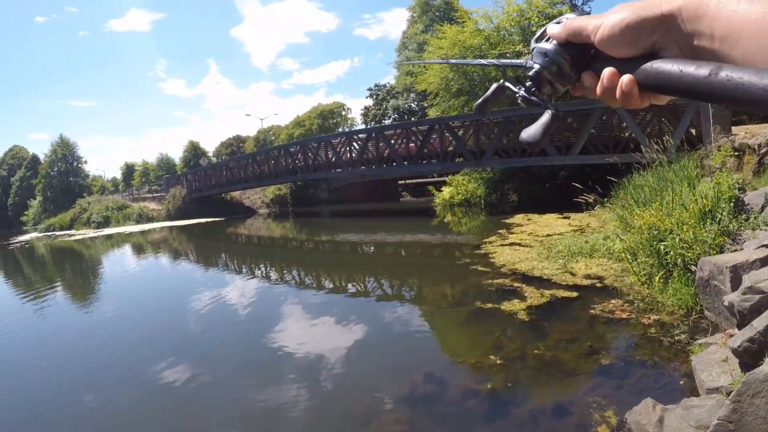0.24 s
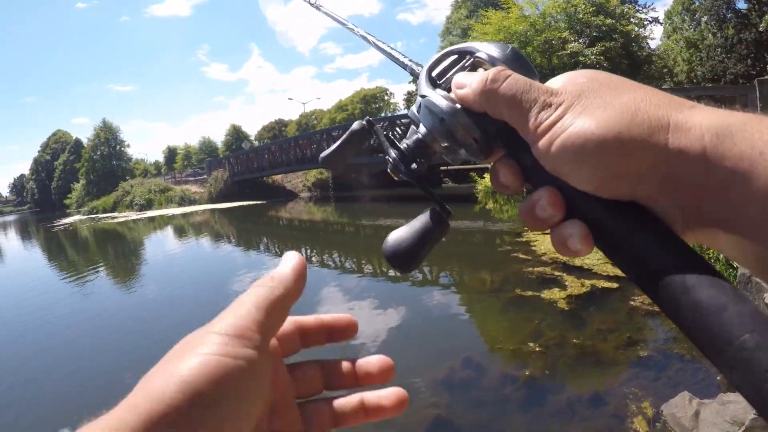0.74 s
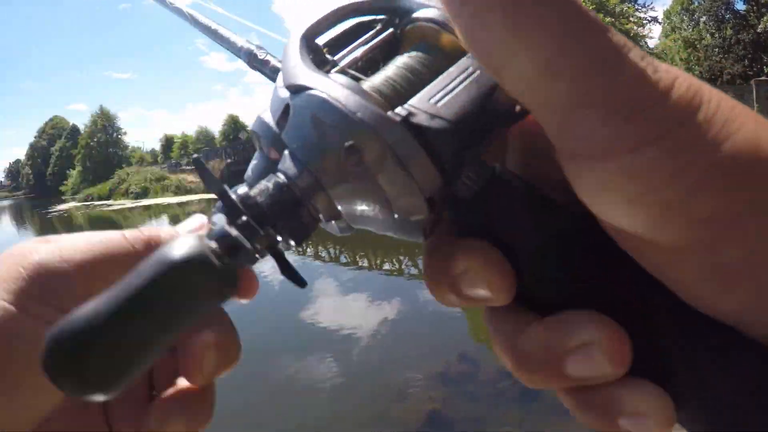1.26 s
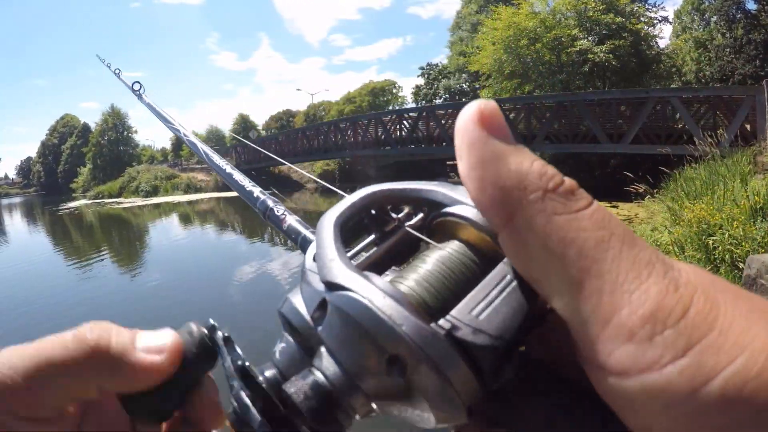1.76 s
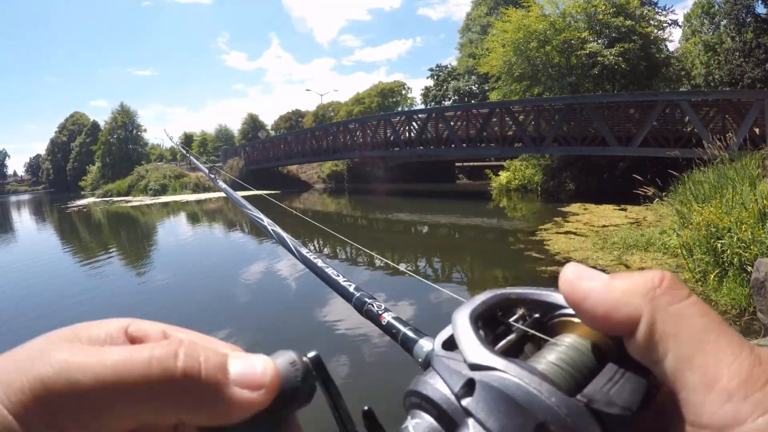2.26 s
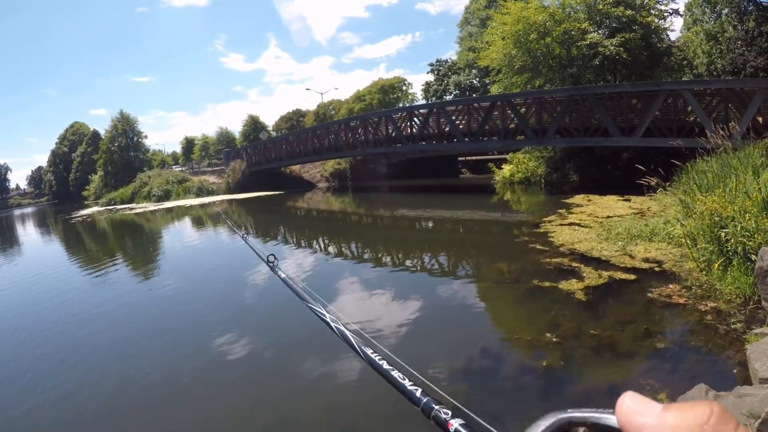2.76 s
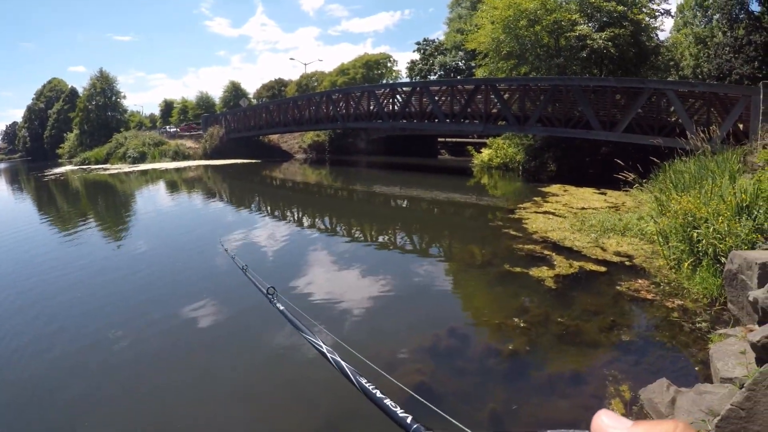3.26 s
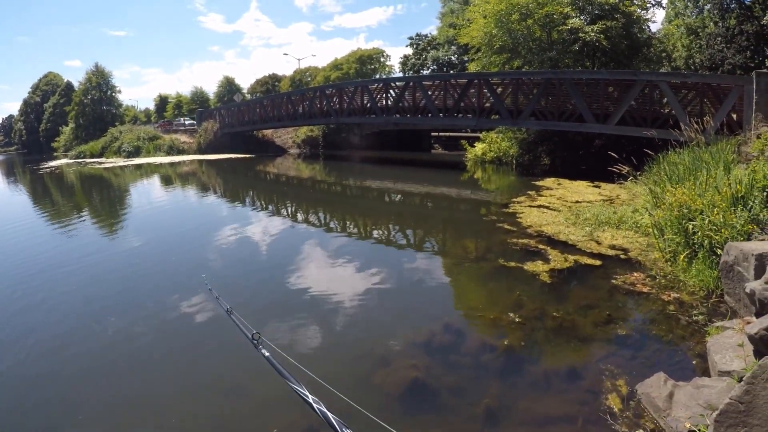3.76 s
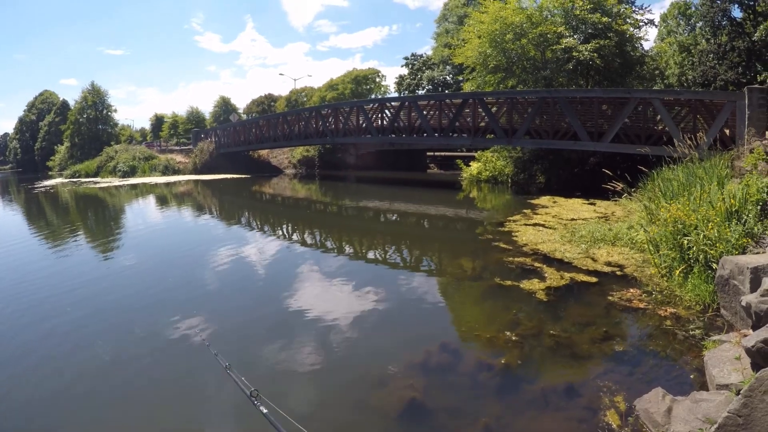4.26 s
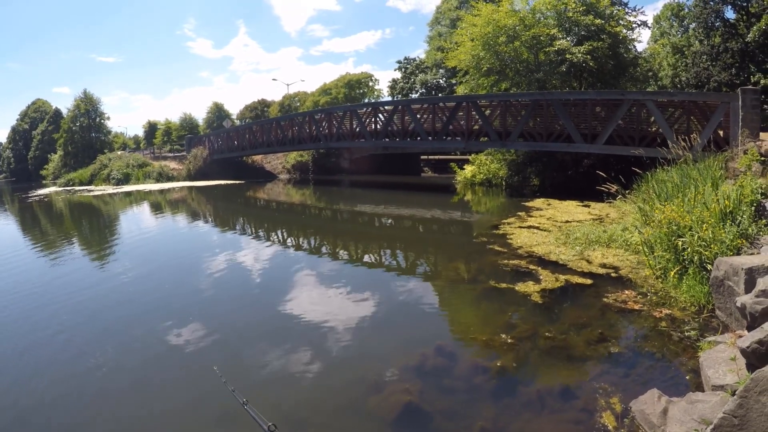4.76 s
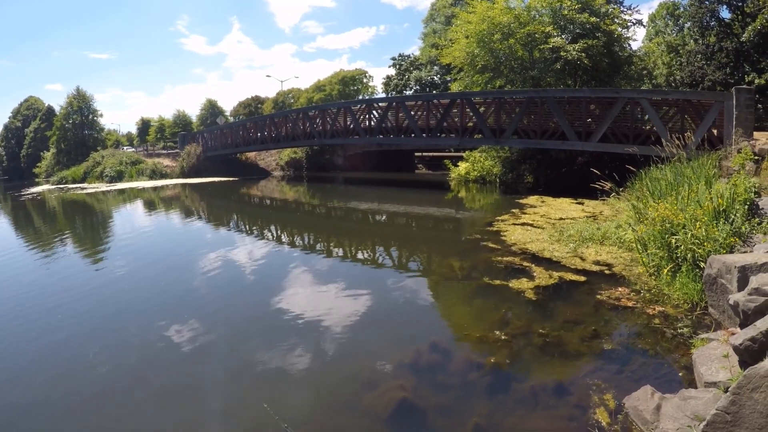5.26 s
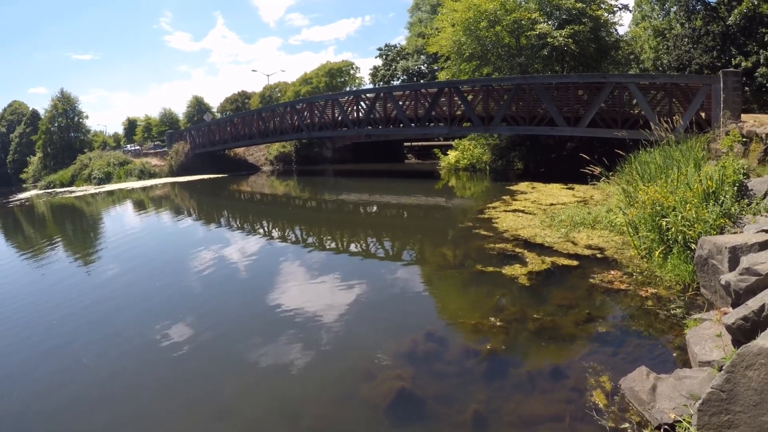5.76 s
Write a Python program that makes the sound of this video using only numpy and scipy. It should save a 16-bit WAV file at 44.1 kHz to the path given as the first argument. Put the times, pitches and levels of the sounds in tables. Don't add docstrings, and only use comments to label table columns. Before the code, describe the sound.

Steady distant traffic rumble and hiss over calm water, a sharp metallic reel clack near one second, then a dull hollow thud.

```python
import sys
import numpy as np
from scipy import signal
from scipy.fft import rfft, irfft
from scipy.io import wavfile
from scipy.ndimage import uniform_filter1d

SR = 44100
rng = np.random.default_rng(int(sys.argv[2]) if len(sys.argv) > 2 else 0)


def gain_from_db(level_db):
    decades = np.asarray(level_db, float) / 20
    return 10 ** decades


def generate_wav(signal):
    frames = np.transpose(np.atleast_2d(signal))
    scaled = np.clip(frames, -1, 1) * 32767
    pcm = np.round(scaled).astype(np.int16)
    wavfile.write(sys.argv[1], SR, pcm)


N = 265041
TIME = np.arange(N) / SR


def evened(x):
    return x / np.sqrt(np.mean(x ** 2) + 1e-20)


def add(mix, start_s, sound):
    part = mix[round(start_s * SR):][:len(sound)]
    part += sound[:len(part)]


def spectrum_db(spectrum, hz):
    knot_hz, db = np.transpose(spectrum)
    return np.interp(np.log(hz + 1), np.log(knot_hz), db, right=-120)


def coloured(x, gain):
    return irfft(rfft(x) * gain(np.fft.rfftfreq(len(x), 1 / SR)), len(x))


def smoothed(x, size, axis=-1):
    return uniform_filter1d(x, size=size, axis=axis)


def wander(count, size):
    return evened(smoothed(smoothed(rng.standard_normal(count), size), size))


def noise_spectra(spectrum, patchy_db, size=1024):
    frames, hz = N * 4 // size + 5, np.fft.rfftfreq(size, 1 / SR)
    real, imag, patches = rng.standard_normal((frames, len(hz), 3)).T
    patches = evened(smoothed(smoothed(patches, 14, axis=0), 12, axis=1))
    level_db = spectrum_db(spectrum, hz)[:, None] + patchy_db * patches
    return hz, (real + 1j * imag) * gain_from_db(level_db)


def sounded(spectra):
    size = 2 * len(spectra) - 2
    return evened(signal.istft(spectra, nperseg=size, noverlap=size * 3 // 4)[1][:N])


def tone(hz, db, waver, shimmer_db, size):
    phase = 2 * np.pi * np.cumsum(hz * (1 + waver * wander(len(hz), 1000))) / SR
    level_db = db + shimmer_db * np.minimum(wander(len(hz), size), 1)
    return np.sqrt(2) * gain_from_db(level_db) * np.sin(phase)


def ring(modes, pitch=1.0):
    t = TIME[:4000]
    return sum(gain_from_db(db - 60 * t / t60) * np.sin(2 * np.pi * pitch * hz * t) for hz, db, t60 in modes)


def swell(ms):
    u = 1000 * TIME[:2048] / ms
    return np.e * u * np.exp(-u)


# time in seconds, level in dB.
FLOW = [(0, 0), (.8, 0), (1.2, 1), (1.6, 1), (2.6, 0.5), (4, 1.5), (4.4, -1), (5.3, -1.5), (6.01, 3.5)]
# frequency in Hz, density in dB per Hz.
RUMBLE = [(12, -9), (20, 4), (30, -11), (45, -2.5), (60, -3.5), (85, -6.5), (110, -4.5), (140, -11),
          (195, -10.5), (330, -12), (430, -41)]
# frequency in Hz, density in dB per Hz.
ROAR = [(150, -4.5), (270, 4.5), (345, -3), (900, -8), (1680, -10.5), (2010, -17), (2900, -20.5),
        (3900, -25.5), (4300, -23.5), (5000, -28), (5750, -30), (6100, -33), (7200, -38), (7800, -46)]


def road():
    flow_db = np.interp(TIME, *np.transpose(FLOW))
    hz, low = noise_spectra(RUMBLE, patchy_db=-0.24, size=2048)
    rumble = sounded(low / (1 + (hz[:, None] / 250) ** 6))
    hz, high = noise_spectra(ROAR, patchy_db=1.0)
    below_1900 = 1 / (1 + (hz[:, None] / 1900) ** 6)
    above_250 = 1 / (1 + (250 / (hz[:, None] + 1)) ** 6)
    roar = sounded(high * below_1900 * above_250)
    tyre_hiss = sounded(high * (1 - below_1900))
    turn_db = 1.4 * np.clip((TIME - 1.15) / 0.22, 0, 1)
    rumble_db = -35 + flow_db
    roar_db = -39 + .1 * flow_db - 0.27 * TIME
    hiss_db = -51 + 0.22 * flow_db + turn_db
    return gain_from_db(rumble_db) * rumble + gain_from_db(roar_db) * roar + gain_from_db(hiss_db) * tyre_hiss


# frequency in Hz, density in dB per Hz.
AIR = [(6500, -8), (8000, -1), (10000, -1.8), (12500, -5.5), (14900, -6.5), (15250, -9), (15320, -45)]
# middle in seconds, length in seconds, level in dB.
MOVES = [(0, .03, -67), (.06, .12, -72), (.2, .3, -77), (.37, .14, -72), (1.16, .08, -78), (1.32, .08, -72),
         (1.62, .08, -73), (1.75, .9, -77), (3.6, .2, -80), (6, .5, -80)]


def rustle():
    power = gain_from_db(2 * -74.3)
    for middle_s, length_s, db in MOVES:
        power = power + gain_from_db(2 * db) * np.exp(-(2 * (TIME - middle_s) / length_s) ** 4)
    return np.sqrt(power) * sounded(noise_spectra(AIR, patchy_db=.3)[1])


# time in seconds, level in dB.
DIESEL = [(0, -56), (.55, -50.5), (.85, -40), (1.6, -40), (2.1, -40), (2.3, -37.5), (3.2, -37),
          (3.8, -40.5), (4.5, -44), (5.1, -39.5), (5.7, -40.5), (6.01, -33)]
# start in seconds, length in seconds, firing rate in Hz,
# glide in Hz per second, level in dB.
LORRIES = [
    (3.851, .75, 105.3, -11, -40),
    (4.451, 0.66, 108.3, 0.5, -49),
]


def engines():
    load_db = np.interp(TIME, *np.transpose(DIESEL))
    firing_hz = np.full(N, 80.3)
    out = tone(firing_hz, load_db, waver=.0056, shimmer_db=1.5, size=4000)
    out += tone(2 * firing_hz, -47, waver=.012, shimmer_db=3, size=6000)
    for start_s, length_s, start_hz, glide, db in LORRIES:
        t = TIME[:round(length_s * SR)]
        drone = tone(start_hz + glide * t, db, waver=.012, shimmer_db=2.5, size=2000)
        add(out, start_s, np.sqrt(np.hanning(len(t))) * drone)
    return out


# start in seconds, level in dB, centre in Hz, width in Hz.
TICKS = [(.0415, -42, 4300, 5500), (.191, -56, 7000, 1500), (1.918, -65, 13600, 2500),
         (2.047, -70, 12000, 3000), (2.272, -65, 12000, 3600), (3.5505, -65, 12800, 4500),
         (3.6035, -51, 6600, 1800), (3.927, -58, 7000, 1200)]


def handle():
    out = np.zeros(N)
    for start_s, db, centre_hz, width_hz in TICKS:
        noise = rng.standard_normal(2048)
        band = coloured(noise, lambda hz: np.exp(-(2 * (hz - centre_hz) / width_hz) ** 4))
        add(out, start_s, gain_from_db(db + 1) * evened(band) * swell(.6))
    return out


# onset in seconds, length in seconds, faint lead-in in seconds, level in dB,
# onset accent in dB.
WHISTLES = [
    (0.522, .455, 0.045, -69.5, 4),
    (5.275, .575, .01, -70, -1),
]


def bird():
    out = np.zeros(N)
    for onset_s, length_s, lead_s, db, accent_db in WHISTLES:
        t = np.arange(-lead_s, length_s, 1 / SR)
        to_end = t - length_s
        hz = 7330 + 723 * np.exp(-t / 0.17) - 330 * np.exp(to_end / .09)
        accent = accent_db * np.exp(-(t / .04) ** 2)
        crest = 5 * np.exp(-((to_end + .155) / .06) ** 2)
        lead = -11 * np.clip(-t / .006, 0, 1)
        release = np.clip(-to_end / .06, 0, 1)
        shape = gain_from_db(lead + accent + crest) * release * signal.windows.tukey(len(t), .03)
        call = shape * tone(hz, db, waver=.0014, shimmer_db=4, size=350)
        add(out, onset_s - lead_s, call)
        add(out, onset_s - lead_s + .043, gain_from_db(-13) * call)
    return out


# start in seconds, level in dB, crack rise in ms, tilt in dB per octave.
SNAPS = [
    (1.0601, -34, .5, -3),
    (1.0609, -25, .5, -4),
    (1.0729, -26, .3, -2),
    (1.0819, -18, .3, -3),
    (1.0828, -21, .35, -1),
    (1.8450, -52, .8, 1.5),
    (1.8460, -39, .6, -5),
]
# frequency in Hz, density in dB per Hz.
CRACK = [(700, -34), (1500, -12), (2900, -9), (3400, -4), (4400, 0), (5500, -5), (6900, -8), (8100, -15),
         (9000, -9), (10300, -17), (12000, -3), (13000, -15), (15000, -16), (15600, -30)]


def pawl_snaps():
    out = np.zeros(N)
    u_ms = 1000 * TIME[:2048]
    buzz = gain_from_db(-14) * np.minimum(u_ms, 1) * np.exp(-(u_ms / 8) ** 2)

    def burst(tilt_db):
        tilted = lambda hz: gain_from_db(spectrum_db(CRACK, hz) + tilt_db * np.log2(hz / 6000 + .1))
        return evened(coloured(rng.standard_normal(2048), tilted))

    for start_s, db, rise_ms, tilt_db in SNAPS:
        crack, rattle = burst(tilt_db), burst(-5.5)
        add(out, start_s, gain_from_db(db) * (crack * swell(rise_ms) + rattle * buzz))
    return out


# start in seconds, plate level in dB, frame level in dB,
# chatter in ms, pitch factor.
KNOCKS = [(1.061, -26, -27, .8, .95), (1.0732, -13.5, -25, 1.7, 0.98), (1.0832, -18.5, -47, .1, 1),
          (1.0831, -12.5, -15.5, .1, 0.89), (1.0864, -36, -18, .1, 1), (1.0857, -23, -30, .1, 0.78),
          (1.8461, -29.5, -42, 3, 0.9)]
# frequency in Hz, level in dB, t60 in seconds.
PLATE = [(2080, -2, .008), (2360, 0, .008), (2750, -20, .006)]
# frequency in Hz, level in dB, t60 in seconds.
FRAME = [(770, -18, .015), (1230, -13, .045), (1400, -4, .008), (1650, 2, .011), (2090, -12, .09)]


def housing():
    out, contact = np.zeros(N), np.hanning(7) / 3
    for start_s, plate_db, frame_db, ms, pitch in KNOCKS:
        t = TIME[:max(round(ms * SR / 1000), 2)]
        chatter = .045 * np.cos(2 * np.pi * 2330 * pitch * t)
        chatter[0] = 1
        blow = np.convolve(chatter, contact)
        add(out, start_s, gain_from_db(plate_db) * np.convolve(blow, ring(PLATE, pitch)))
        add(out, start_s, gain_from_db(frame_db) * np.convolve(contact, ring(FRAME)))
    return signal.lfilter(*signal.butter(1, 800, "high", fs=SR), out)


# start in seconds, level in dB.
SEATS = [
    (1.0612, -34),
    (1.0731, -33),
    (1.0822, -20),
    (1.08312, -21),
]
# frequency in Hz, level in dB, t60 in seconds.
PAWL = [(3280, -12, .012), (4400, 1, .008), (4900, 1, .007), (5530, -5, .012), (6100, -5, .010),
        (6900, -4, .007), (7600, -1, .005), (9050, 4, .0035), (10600, -4, .003), (11975, 3, .0045),
        (12900, -3, .003), (14300, -4, .003), (15100, -13, .005)]


def pawl_seats():
    out = np.zeros(N)
    for start_s, db in SEATS:
        add(out, start_s, gain_from_db(db) * -np.expm1(-TIME[:4000] / .00012) * ring(PAWL))
    return out


# time in seconds, level in dB.
BUMPS = [
    (1.75, -26),
    (1.7575, -22.5),
    (1.772, -21.5),
    (1.786, -28),
]
# frequency in Hz, density in dB per Hz.
SCUFF = [(100, -14), (280, -2), (640, -1), (850, -7), (1030, -4), (1250, -12), (1750, -8), (2400, -15),
         (3000, -34)]


def rod():
    crest_s, boom_hz, sag_per_s = 1.7565, 189, 3.2
    u = np.arange(-.04, .08, 1 / SR)
    t = crest_s + u

    def push(width_s):
        return np.sqrt(sum(gain_from_db(2 * db) * np.exp(-2 * ((t - s) / width_s) ** 2) for s, db in BUMPS))

    boom = np.sqrt(2) * np.cos(2 * np.pi * boom_hz * u * (1 - sag_per_s * u / 2))
    noise = rng.standard_normal(len(t))
    scuff = evened(coloured(noise, lambda hz: gain_from_db(spectrum_db(SCUFF, hz))))
    out = np.zeros(N)
    add(out, t[0], push(.0053) * boom + gain_from_db(-9) * push(.0083) * scuff)
    return out


def scene():
    reel = pawl_snaps() + housing() + pawl_seats()
    return (road() + rustle() + engines() + handle() + bird() + reel + rod())[None]


def starved(x, edge_hz=12700, keep_db=-107.6, spread_db=1):
    hz, _, z = signal.stft(x, SR, nperseg=2048)
    band = np.arange(len(hz)) // 8
    power = np.add.reduceat(abs(z) ** 2, np.arange(0, len(hz), 8)) / 8
    threshold = gain_from_db(2 * (keep_db + spread_db * rng.standard_normal(power.shape)))
    kept = (power > threshold)[band] | (hz[:, None] < edge_hz)
    return signal.istft(z * kept, SR, nperseg=2048)[1][:N]


def band_limit(x):
    return signal.sosfilt(signal.butter(12, 16500, fs=SR, output="sos"), x)


def record(dry):
    mix = starved(dry[0])[None]
    return band_limit(mix)


dry = scene()
out = record(dry)
generate_wav(out)
```